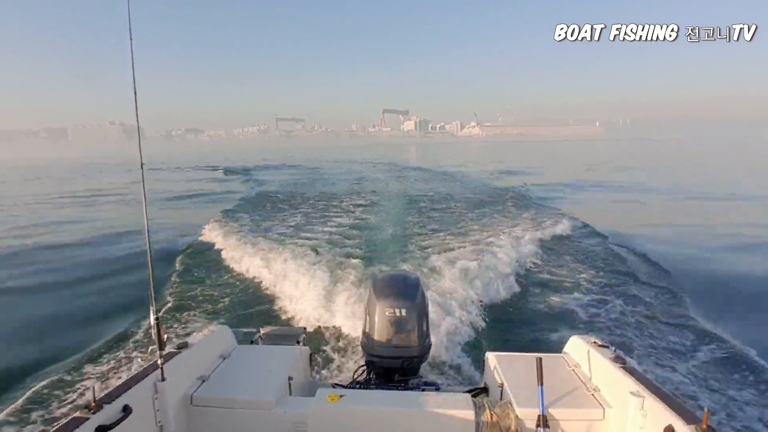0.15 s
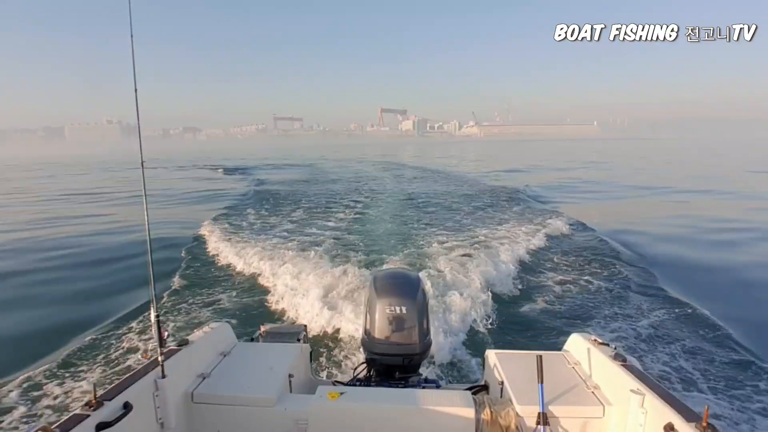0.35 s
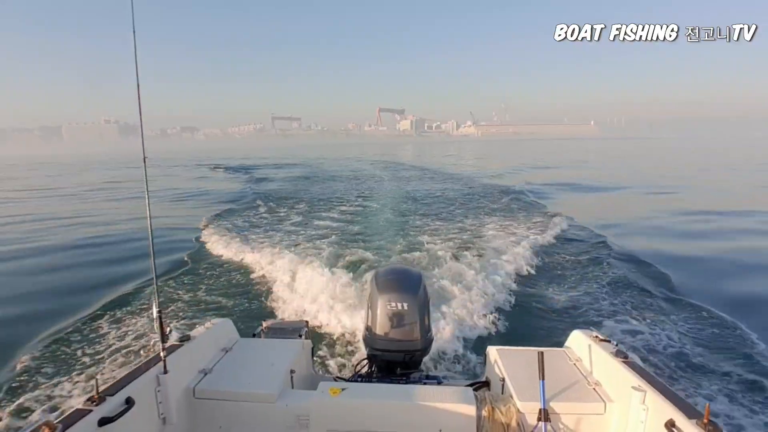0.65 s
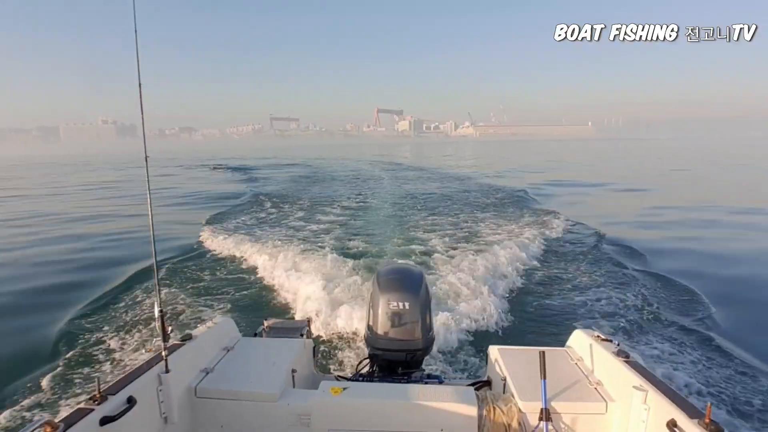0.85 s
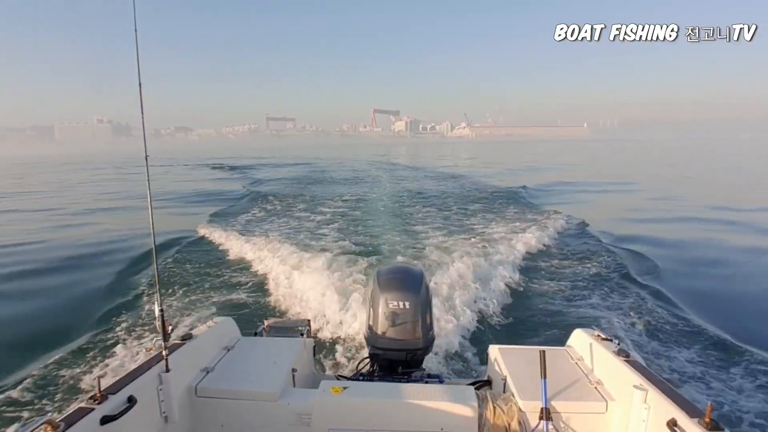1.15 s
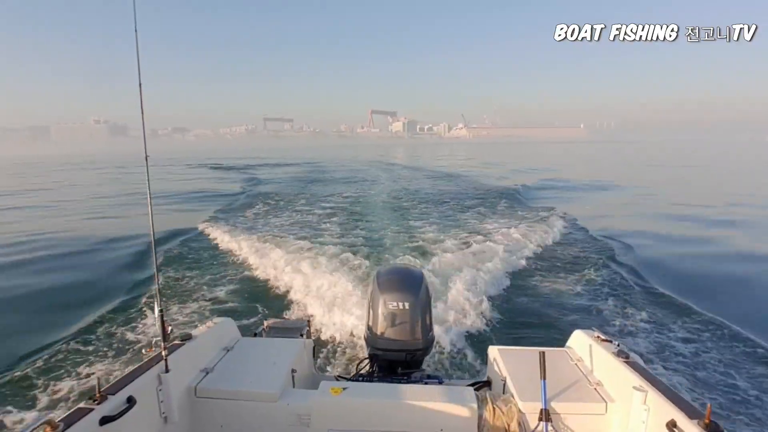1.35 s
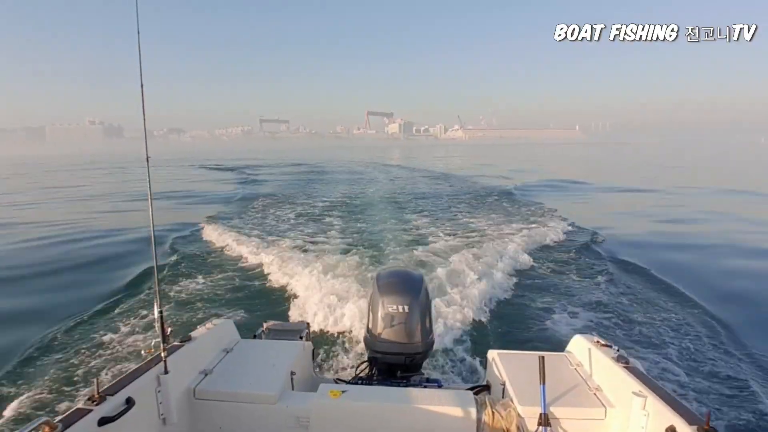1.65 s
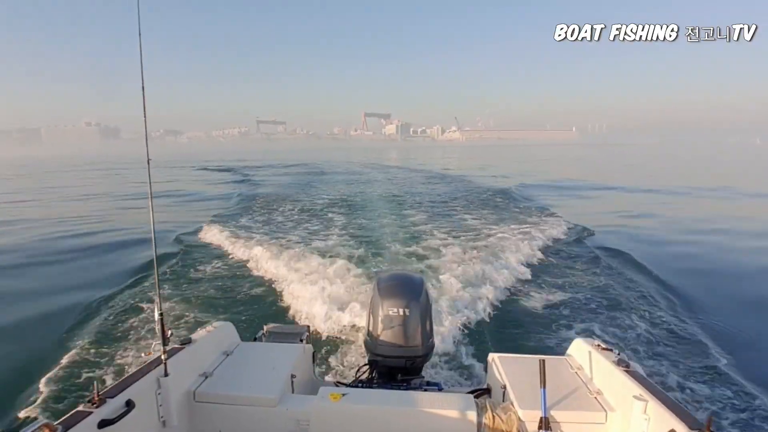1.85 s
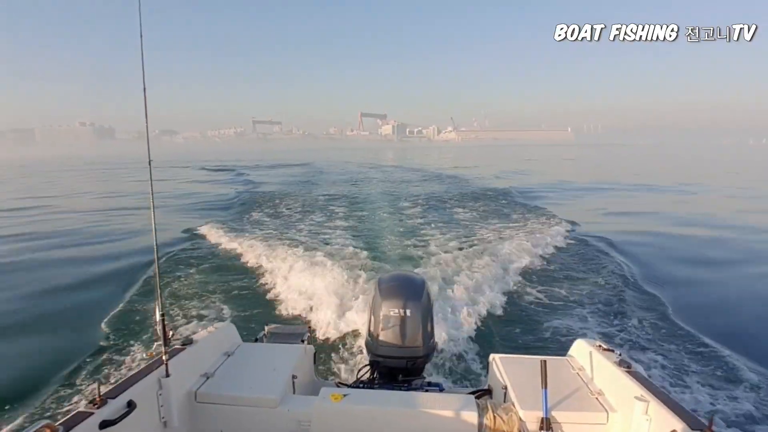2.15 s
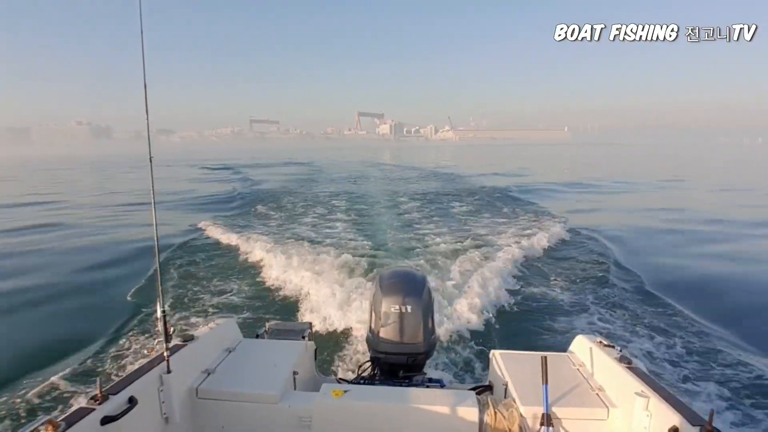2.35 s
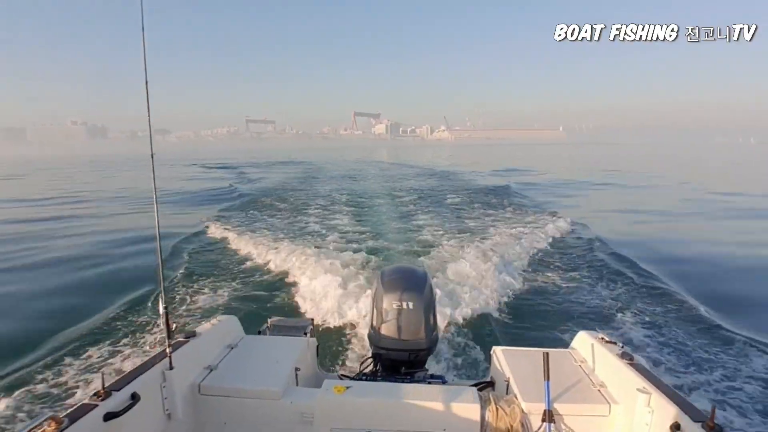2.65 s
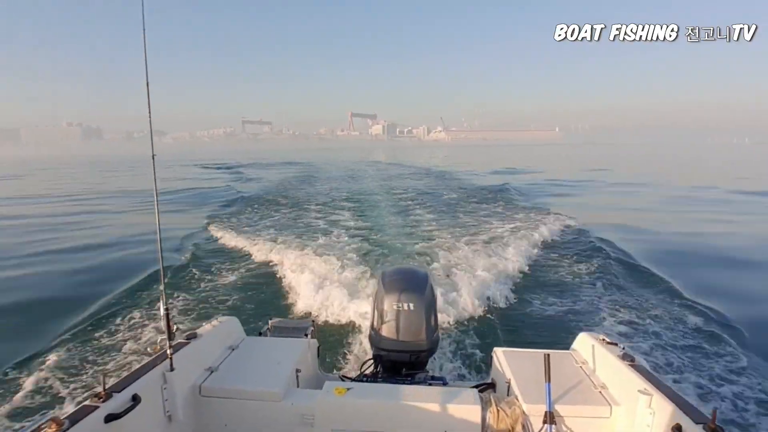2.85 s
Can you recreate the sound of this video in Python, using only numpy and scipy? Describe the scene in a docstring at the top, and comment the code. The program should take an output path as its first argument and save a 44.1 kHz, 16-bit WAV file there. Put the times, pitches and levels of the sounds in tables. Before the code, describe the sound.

An outboard motor drones steadily while churned water rushes behind a small boat.

```python
"""Small boat with an outboard motor

A four-stroke motor pushes the boat over a calm sea at a steady speed, heard from on board.
Its firings make a low drone and puffs of exhaust. Valves and gears rattle the motor's cover,
while a gear whine and a metallic ring swell and fade. Behind the boat the churned water
rushes, fizzes with tiny bubbles and splashes twice."""
import sys
import numpy as np
from scipy import signal
from scipy.io import wavfile

SR = 44100
rng = np.random.default_rng(int(sys.argv[2]) if len(sys.argv) > 2 else 0)


def digitize_waveform(pressure):
    """Quantize a signal to 16-bit integers and store it at the path in sys.argv[1].

    Rows of a 2-D input are taken as channels; values are limited to [-1, 1].
    """
    field = np.atleast_2d(pressure).T
    bounded = np.clip(field, -1, 1)
    quanta = np.round(bounded * 32767).astype(np.int16)
    wavfile.write(sys.argv[1], SR, quanta)


N = 132300  # 3 seconds


def from_db(db):
    """Turn decibels into a gain."""
    return 10 ** (np.asarray(db) / 20)


def unit_level(sound):
    """Scale a sound to an average (rms) level of 1."""
    return sound / np.sqrt(np.mean(sound ** 2) + 1e-20)


def over_time(table):
    """Join a table's points into one value for every sample."""
    return np.interp(np.arange(N) / SR, *np.transpose(table))


def at_pitch(table, hz):
    """Read a table's value at one pitch."""
    pitches, values = np.transpose(table)
    return np.interp(np.log(hz), np.log(pitches), values)


def pan(db):
    """Left and right gains; positive db makes the left louder."""
    return from_db(np.array([[.5], [-.5]]) * db)


def drift(rate_hz):
    """A smooth random wobble, about 1 in size."""
    keep = np.exp(-80 * np.pi * rate_hz / SR)
    steps = rng.standard_normal(N // 40 + 2002)  # one every 40 samples
    slow = signal.lfilter([1], [1, -2 * keep, keep * keep], steps)[2000:]
    return np.interp(np.arange(N) / 40, np.arange(len(slow)), unit_level(slow - slow.mean()))


# How alike the two sides sound (1 is the same, 0 unrelated): pitch_hz, likeness
LEFT_RIGHT_LIKENESS = [(30, .94), (200, .96), (400, .95), (560, .8), (790, .68), (1140, .6), (1450, .8),
                       (1700, .6), (2100, .76), (2500, .5), (3200, -.25), (3700, .05), (4200, -.2),
                       (5400, .15), (7000, 0), (16000, 0)]


def stereo(pair, hz):
    """Mix two unrelated noises into left and right, most alike at low pitches."""
    alike = at_pitch(LEFT_RIGHT_LIKENESS, hz)
    return np.sqrt(1 + alike) * pair[0] + np.sqrt(1 - alike) * pair[1] * np.array([[1], [-1]])


# Which side the wake and exhaust noise lean to: pitch_hz, left_minus_right_db
NOISE_BALANCE = [(60, -5), (160, -1), (270, -1.5), (740, 0), (1220, -9), (2010, 6), (3330, -0.5),
                 (5500, 4.5), (9080, -1.3), (15000, -3)]


def banded_noise(spectrum, flicker_db):
    """Narrow bands of stereo noise, each flickering on its own."""
    edges_hz = np.r_[np.geomspace(20, 800, 13)[:-1], np.geomspace(800, 17000, 29)]
    out, hiss = 0, rng.standard_normal((2, 2, N))
    for k, (low, high) in enumerate(zip(edges_hz, edges_hz[1:])):
        band = signal.sosfilt(signal.butter(2, [low, high], "band", fs=SR, output="sos"), hiss[k % 2])
        hz = np.sqrt(low * high)
        if hz < spectrum[-1][0] * 1.1:
            gain = from_db(at_pitch(spectrum, hz) + flicker_db * drift(31))
            out = out + gain * stereo(band, hz) * pan(at_pitch(NOISE_BALANCE, hz))
    return unit_level(out)


# Brief splashes behind the boat: peak_s, level_db
SPLASHES = [(1.47, -39.5), (2.35, -48)]


def splashes():
    """Crests topple in the wake: short, bright swells of spray."""
    pitch_hz, width_hz, swell_s = 4820, 470, 0.051
    t = np.arange(N) / SR
    band = signal.iirpeak(pitch_hz, pitch_hz / width_hz, fs=SR)
    spray = unit_level(signal.lfilter(*band, rng.standard_normal((2, N))))
    return spray * sum(from_db(db) * np.exp(-((t - peak_s) / swell_s) ** 2) for peak_s, db in SPLASHES)


# The tone of the churned water: pitch_hz, relative_level_db
WAKE_SPECTRUM = [(500, -15), (1090, -4.5), (1300, 2.5), (2400, 2.5), (2650, 4), (3050, -6), (3450, 0),
                 (4200, 0), (4800, .5), (5600, -2.5), (6900, -3.5), (7500, -10), (8400, -12), (9900, -16.5),
                 (11500, -12.5), (16000, -13.5)]
# The wake's gentle rise and fall: time_s, gain_db
WAKE_SURGE = [(0, -1.2), (.4, 0.5), (.7, 1.3), (1.0, 0.6), (1.45, 1.6), (1.8, 0.6), (3, 0.7)]


def wake():
    """Churned water rushes, and small bubbles ring in the foam."""
    bubbles_per_s, ring_cycles = 650, 500  # a bubble fades by 60 dB in this many cycles
    rush = from_db(-35) * banded_noise(WAKE_SPECTRUM, flicker_db=1.5)
    fizz, pitches_hz = 0, np.geomspace(2800, 7000, num=36)
    strengths = from_db(4 * np.minimum(rng.exponential(1, (2, N)), 5))
    for hz in pitches_hz:
        born = rng.random((2, N)) < bubbles_per_s / len(pitches_hz) / SR
        decay = from_db(-60 * hz / (ring_cycles * SR))
        ringing = [1, -2 * decay * np.cos(2 * np.pi * hz / SR), decay * decay]
        bubbles = signal.lfilter([1, 0, -1], ringing, born * strengths + 1e-18)
        fizz = fizz + from_db(at_pitch(WAKE_SPECTRUM, hz)) * bubbles
    fizz = signal.sosfilt(signal.butter(4, 7060, "lowpass", fs=SR, output="sos"), fizz)
    surge = from_db(over_time(WAKE_SURGE) + 0.2 * drift(rate_hz=18))
    return (rush + from_db(-43) * unit_level(fizz)) * surge


# How loud the metallic ring is: time_s, level_db
RING_LEVEL = [(0, -46), (.2, -46), (.5, -39), (.75, -33.5), (1.0, -33.5), (1.2, -39), (1.45, -34.5),
              (1.6, -38), (2.1, -43), (2.5, -53), (2.75, -35.5), (3, -43)]


def metallic_ring():
    """A rough, wavering ring from the motor, pitched just above the gear whine."""
    pitch_hz = 2105 + 46.7 * drift(rate_hz=6.97)
    roughness = 1 + 0.75 * drift(rate_hz=30)
    tone = np.sin(2 * np.pi * np.cumsum(pitch_hz) / SR + np.array([[.4], [-.4]]))
    return from_db(over_time(RING_LEVEL)) * unit_level(roughness * tone)


# How the gear whine swells and fades: time_s, relative_level_db
WHINE_LEVEL = [(0, -44), (.1, -43), (.17, -32.5), (.25, -35), (.33, -29.5), (.43, -31), (.55, -46),
               (.67, -44), (.76, -31), (.88, -35), (1.0, -44), (1.1, -31), (1.23, -29), (1.44, -44),
               (1.48, -43), (1.54, -29), (1.65, -31), (1.75, -41), (1.85, -31.5), (1.97, -30.5),
               (2.07, -40), (2.2, -32), (2.36, -33), (2.46, -46), (2.58, -35), (2.68, -29.5), (2.79, -47),
               (3.0, -44)]


def gear_whine(firings):
    """Gear teeth meet in step with the motor's shaft, a little roughly, and make a high tone."""
    teeth_per_firing = 24
    phase = 2 * np.pi * teeth_per_firing * firings + 0.2 * drift(rate_hz=40)
    tone = np.sqrt(2) * np.sin(phase + np.array([[.3], [-.3]]))
    roughness = 1 + 0.23 * drift(rate_hz=46)
    return from_db(over_time(WHINE_LEVEL) - 0.1) * roughness * tone * pan(db=1.5)


# The notes the motor's cover rings at: pitch_hz, width_hz, relative_level_db, left_minus_right_db
COVER_NOTES = [(656, 115, -42.5, -1), (1413, 183, -38, -0.5), (1535, 55, -46, -11), (1644, 83, -38, 2),
               (1781, 110, -43.5, -14), (1925, 77, -40.5, 6.5), (2014, 133, -36.5, -0.5),
               (2144, 105, -42, -11), (2335, 167, -40, 5.5), (2900, 220, -44.5, 0), (3102, 93, -50.5, 1),
               (4730, 700, -45, -3.5), (6800, 450, -49, -2)]
# The rattle's rise and fall: time_s, gain_db
RATTLE_SWELL = [(0, 1.5), (.3, -0.5), (.85, -2), (1.1, -1.5), (1.45, -2), (1.8, -.7), (2.35, -1),
                (2.5, -1.5), (2.65, -3), (3, -1.5)]


def cover_rattle(firings):
    """Countless taps of valves and gears, uneven over the four cylinders, make the cover ring."""
    force = 1 + 0.024 * np.cos(2 * np.pi * firings) + 0.18 * np.cos(2 * np.pi * firings / 4)
    out = 0
    for hz, width_hz, db, pan_db in COVER_NOTES:
        taps = force * rng.standard_normal((2, N))
        note = signal.iirpeak(hz, hz / width_hz, fs=SR)
        ringing = signal.lfilter(*note, signal.lfilter(*note, taps))
        gain = from_db(db - 0.5 + 1.86 * drift(rate_hz=8.2))
        out = out + gain * unit_level(stereo(ringing, hz)) * pan(pan_db)
    return out * from_db(over_time(RATTLE_SWELL))


# The tone of the exhaust noise: pitch_hz, relative_level_db
EXHAUST_SPECTRUM = [(20, -24), (40, -0.5), (65, 5), (110, 0.5), (180, -7), (300, -1.5), (430, -6),
                    (520, -8), (660, -8), (850, -14), (1050, -27.5), (1600, -18)]


def exhaust(firings):
    """Burbling noise, puffed out once for each firing."""
    puffs = 1 + 0.17 * np.cos(2 * np.pi * firings)
    return from_db(-31) * unit_level(puffs * banded_noise(EXHAUST_SPECTRUM, flicker_db=0.94))


# The drone's main note, at the firing rate: time_s, relative_level_db
MAIN_NOTE_LEVEL = [(0, -22), (.23, -20), (.4, -21), (.52, -19.7), (.95, -21), (1.12, -23), (1.25, -20),
                   (1.4, -20.8), (1.62, -19.3), (1.87, -21), (2.2, -19.3), (2.45, -19.7), (2.62, -17.7),
                   (3, -19.5)]
# The note an octave above it: time_s, relative_level_db
OCTAVE_LEVEL = [(0, -27.5), (.12, -24.5), (.53, -29), (.66, -23.5), (.77, -28), (1.18, -28), (1.32, -27),
                (1.58, -27.5), (1.68, -32.5), (2.15, -28), (2.35, -30.5), (2.62, -24), (3, -29.5)]
# The pitches of the drone's weaker notes: times_firing_rate
WEAK_NOTE_MULTIPLES = np.array([.75, 1.5, 1.75, 3, 4, 5, 6, 6.5, 7, 8, 17, 17.5, 18, 20.5, 27])
# How loud those notes are, in the same order: relative_level_db
WEAK_NOTE_LEVELS = [-46, -48, -41.5, -42.5, -36.5, -37.5, -39, -54, -46, -57, -56.5, -43, -51, -46, -46.5]
# The note at six times the firing rate fades in: time_s, gain_db
SIXTH_NOTE_RISE = [(0, -32), (1.0, -18), (1.25, .5), (2.3, 0.5), (3, 0)]


def drone(firings, rate_hz):
    """Each firing is a dip in pressure: together they make a low note, its octave and weaker notes."""
    octave_lag_s, left_lag_rad = 0.00068, 0.31  # the main note reaches the left side later
    main_note = np.cos(2 * np.pi * firings + left_lag_rad * np.array([[-.5], [.5]]))
    octave = np.cos(2 * np.pi * 2 * (firings - octave_lag_s * rate_hz))
    out = from_db(over_time(MAIN_NOTE_LEVEL) + 0.1) * main_note * pan(db=-1.9)
    out += from_db(over_time(OCTAVE_LEVEL) - 0.2) * octave * pan(db=-1)
    for multiple, db in zip(WEAK_NOTE_MULTIPLES, WEAK_NOTE_LEVELS):
        level_db = db + 0.96 * drift(rate_hz=2.5)
        if multiple == 6:
            level_db += over_time(SIXTH_NOTE_RISE)
        note = np.cos(2 * np.pi * (multiple * firings + rng.random()))
        out += from_db(level_db) * note * pan(db=-3)
    return -np.sqrt(2) * out


# How often the motor fires: time_s, rate_hz
FIRING_RATE = [(0, 79.95), (.33, 79.85), (.45, 79.6), (.55, 79.05), (.67, 80.25), (.8, 79.55),
               (1.08, 80.15), (1.2, 79.8), (1.3, 80.2), (1.46, 79.4), (1.62, 80.35), (1.8, 80.05),
               (2.03, 79.9), (2.26, 80.45), (2.54, 79.7), (2.66, 79.8), (2.77, 80.4), (3, 80.55)]


def scene():
    """One shaft keeps the drone, exhaust, rattle and whine in step; the water lies behind them."""
    rate_hz = over_time(FIRING_RATE)
    firings = np.cumsum(rate_hz) / SR + 0.0023 * drift(rate_hz=22)  # a running count, slightly uneven
    motor = drone(firings, rate_hz) + exhaust(firings) + cover_rattle(firings) + gear_whine(firings)
    return motor + metallic_ring() + wake() + splashes()


def record(dry):
    """The very highest treble is cut off steeply."""
    cutoff_hz = 15800
    return signal.sosfilt(signal.ellip(12, .1, 90, cutoff_hz, fs=SR, output="sos"), dry)


dry = scene()
out = record(dry)
digitize_waveform(out)
```